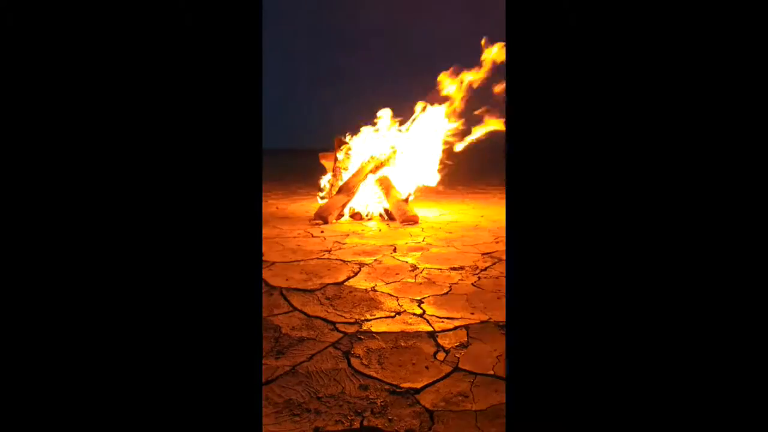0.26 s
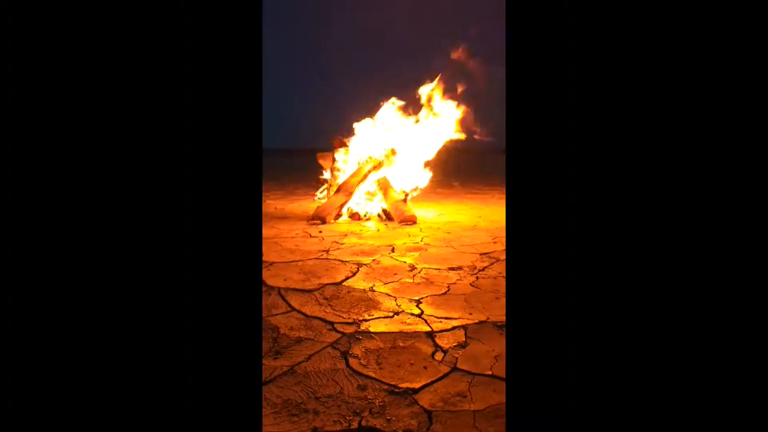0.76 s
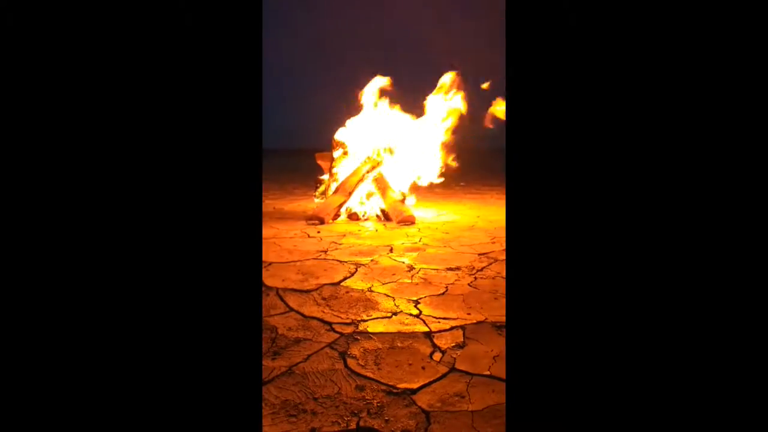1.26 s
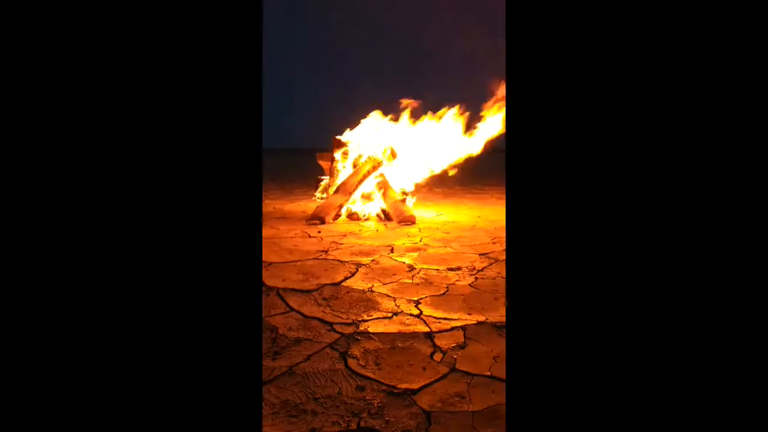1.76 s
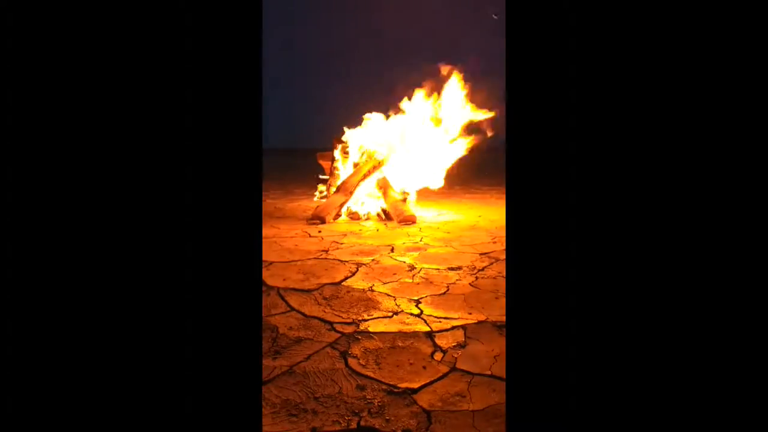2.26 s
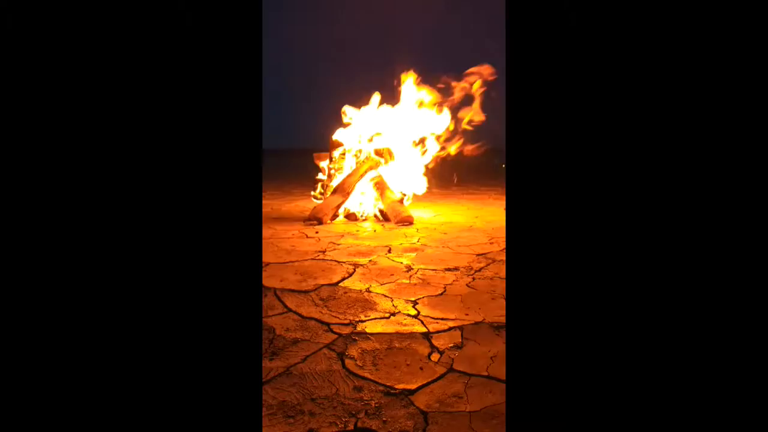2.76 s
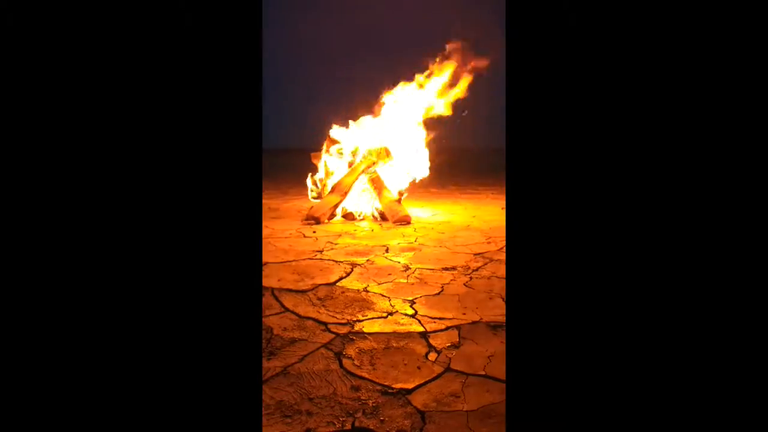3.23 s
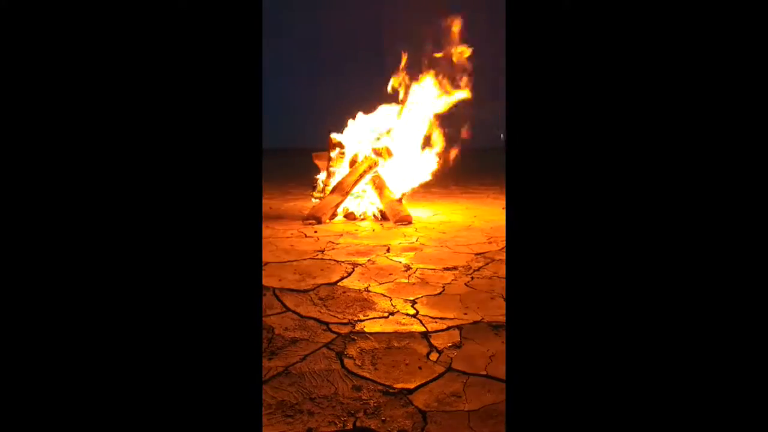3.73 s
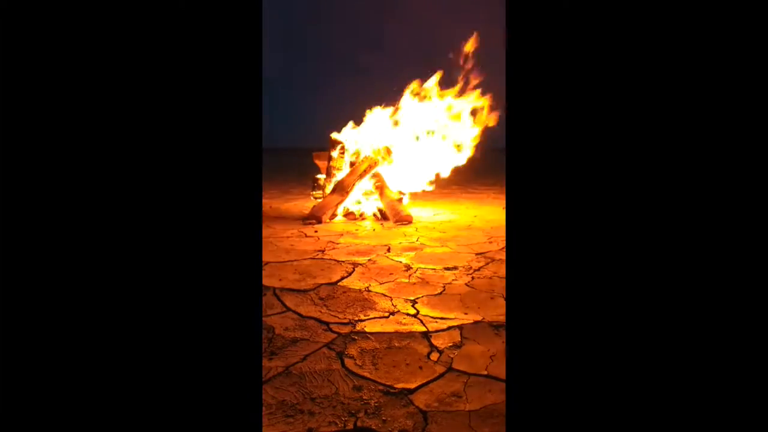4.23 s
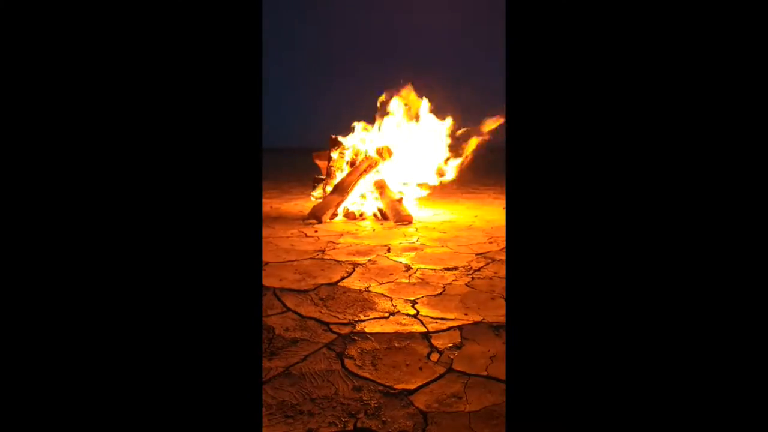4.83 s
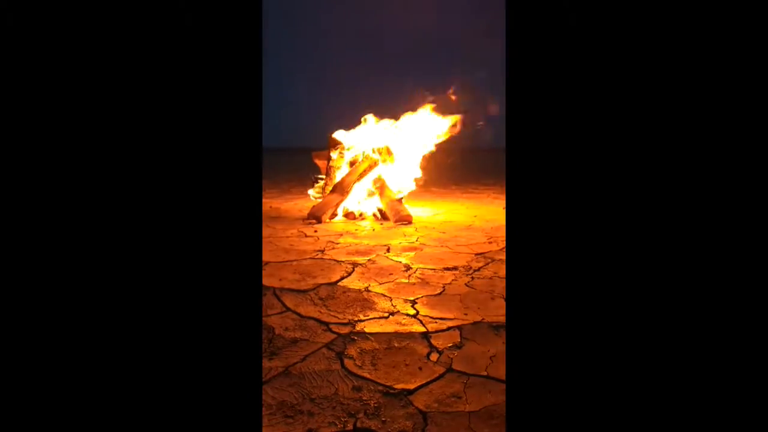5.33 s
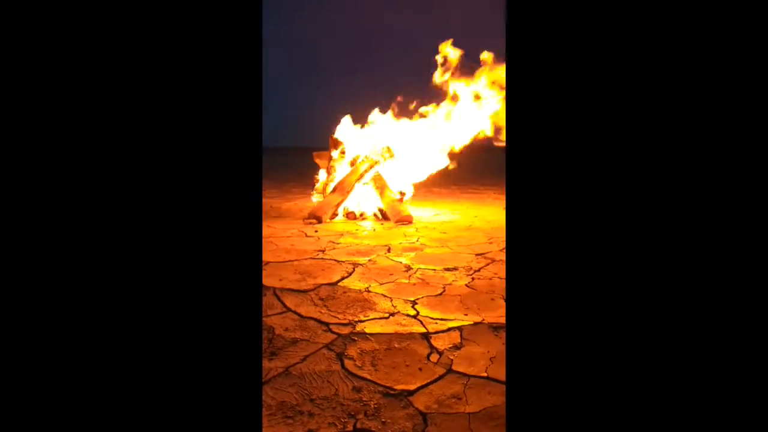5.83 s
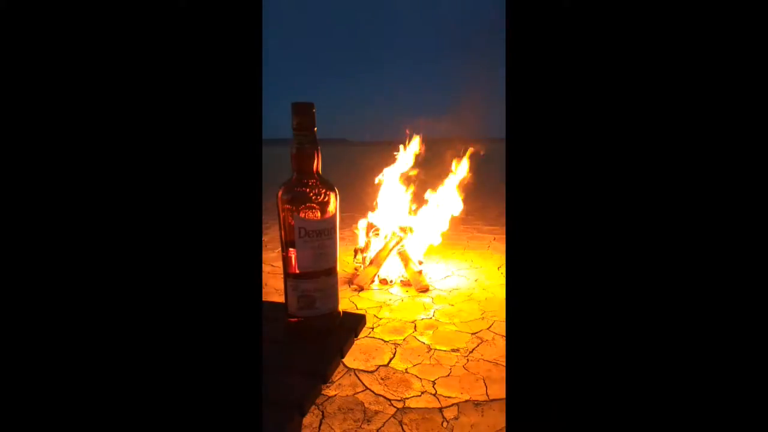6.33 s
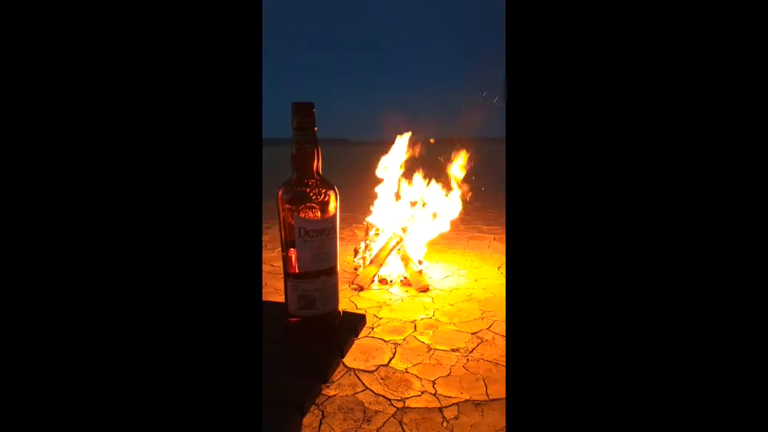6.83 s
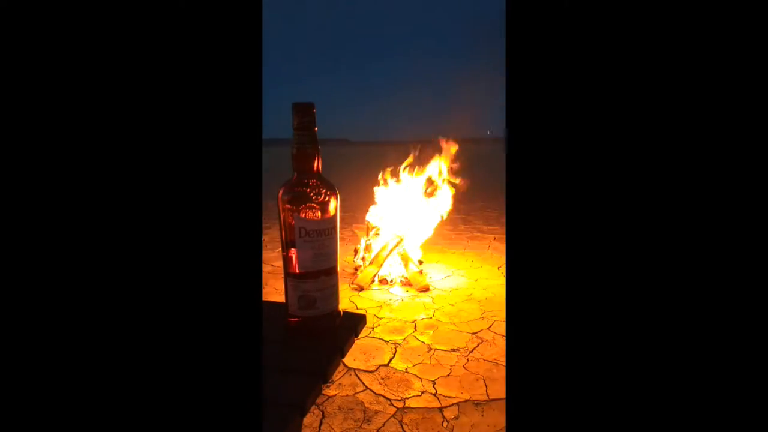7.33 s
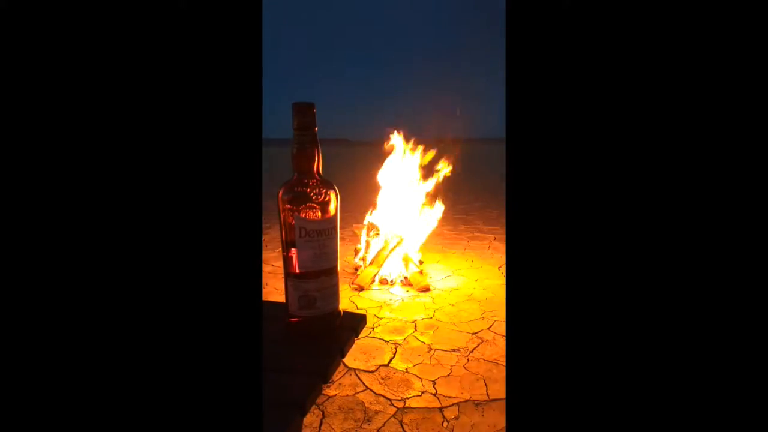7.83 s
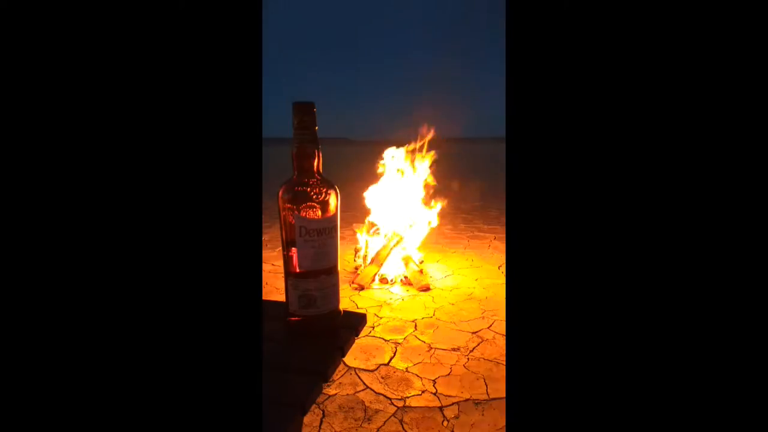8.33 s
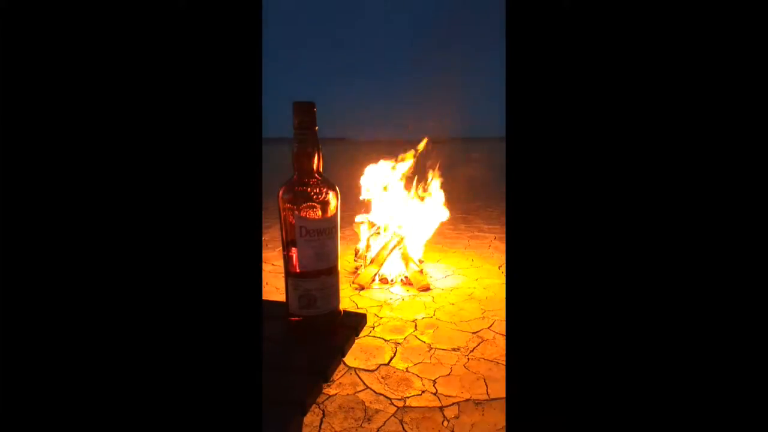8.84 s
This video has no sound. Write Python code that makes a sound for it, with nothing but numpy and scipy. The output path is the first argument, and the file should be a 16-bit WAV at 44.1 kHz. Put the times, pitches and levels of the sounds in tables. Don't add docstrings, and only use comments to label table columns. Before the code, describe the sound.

Close outdoor fire: whistly, breathy hiss from escaping gas, rapid low flame flutter, thin ember fizz and scattered ticks. Sharp wood snaps dip the phone's automatic level, which then recovers. Two abrupt scene changes, near the start and at six seconds, each fade in from near silence. Wind buffets low just before the second; afterwards the fire is a little quieter, with bright snaps, quiet burning and one late dull pop.

```python
import sys
import numpy as np
from scipy import signal
from scipy.fft import rfft, irfft, next_fast_len
from scipy.io import wavfile
from scipy.ndimage import uniform_filter1d

SR = 44100
rng = np.random.default_rng(int(sys.argv[2]) if len(sys.argv) > 2 else 0)


def amplitude_ratio(level_db):
    exponent = np.asarray(level_db, float) / 20
    return 10 ** exponent


def bounce(signal):
    frames = np.transpose(np.atleast_2d(signal))
    limited = np.clip(frames, -1, 1)
    pcm = np.round(limited * 32767).astype(np.int16)
    wavfile.write(sys.argv[1], SR, pcm)


N = 400869


def colour(x, points):
    hz, db = np.transpose(points)
    size = next_fast_len(len(x))
    f = np.maximum(np.fft.rfftfreq(size, 1 / SR), 1)
    gain = amplitude_ratio(np.interp(np.log(f), np.log(hz), db, -120, -120))
    y = irfft(rfft(x, size) * gain, size)[:len(x)]
    return y / np.std(y)


def noise():
    return rng.standard_normal(N)


def walk(rate):
    hold = int(SR / rate)
    steps = np.repeat(rng.standard_normal(N // hold + 1), hold)
    return 1.64 * uniform_filter1d(uniform_filter1d(steps, hold), hold)[:N]


def butter(x, hz, kind, order=2):
    return signal.sosfilt(signal.butter(order, np.clip(hz, 20, .45 * SR), kind, fs=SR, output="sos"), x)


def ring(x, hz, width_hz):
    y = signal.lfilter(*signal.iirpeak(min(hz, .45 * SR), hz / width_hz, fs=SR), x)
    return y / np.max(np.abs(y))


def late(x, count):
    return np.concatenate([np.zeros(count), x[:len(x) - count]])


def add(track, s, sound):
    i = int(s * SR)
    track[i:i + len(sound)] += sound[:len(track) - i]


# frequency in Hz, density in dB per Hz.
HISS_SPECTRUM = [(500, -20.5), (800, -25), (1100, -12), (1250, -16.5), (1350, -23.5), (1500, -6.5),
                 (1900, -0.5), (2300, -5.5), (2800, -7), (3300, -20.5), (3900, -30), (5000, -33),
                 (7000, -44), (16000, -58.5)]


def hiss():
    return colour(noise(), HISS_SPECTRUM) * amplitude_ratio(0.68 * walk(14))


# frequency in Hz, density in dB per Hz.
SCATTER_SPECTRUM = [(600, -3), (1350, -10), (2000, 0), (2800, -1), (3400, -28.5), (3950, -15),
                    (4500, -10.5), (6000, -43)]


def scattered_hiss():
    return amplitude_ratio(-14) * colour(noise(), SCATTER_SPECTRUM)


# frequency in Hz, density in dB per Hz.
ROAR_SPECTRUM = [(30, -14.5), (70, 1.5), (130, 1), (220, -6), (330, -17), (480, -18), (700, -26.5),
                 (1200, -19.5)]
# time in seconds, roar over hiss in dB.
FLAP_LEVELS = [(0, -4.5), (.6, -6.5), (.95, -5.5), (2, -5), (3, -5), (3.8, -6.5), (4.4, -4.5), (5, -3),
               (5.5, -5.5), (5.9, -2), (6.05, 1), (6.15, -8.5), (7.5, -7.5), (9.09, -9.5)]


def roar(t):
    flutter = colour(noise(), ROAR_SPECTRUM) * amplitude_ratio(2.0 * walk(30))
    puff_spectrum = [(150, -17.0), (300, 0.5), (500, 0.0), (800, -20.5)]
    puffs = colour(noise(), puff_spectrum) * amplitude_ratio(5.2 * walk(35) - 25.5)
    return (flutter + puffs) * amplitude_ratio(np.interp(t, *np.transpose(FLAP_LEVELS)) + 0.5)


# start in seconds, peak in dB, snap centre in Hz, body over snap in dB, body pitch in Hz.
WOOD_CRACKS = [
    (1.0545, -20, 5000, 0.5, 2940),
    (1.3846, -15.5, 9300, -1, 3300),
    (1.6271, -33.5, 5200, 1, 2800),
    (2.3345, -22.5, 4800, 8.5, 2930),
    (5.5047, -34.5, 8700, 9, 1100),
    (5.8236, -27.5, 9000, -4.5, 3500),
    (6.2844, -22.5, 5900, -2, 3500),
    (6.9133, -20.5, 11000, -7.5, 5300),
    (6.9793, -19, 9400, -8, 5000),
]
# start in seconds, peak in dB, centre in Hz.
EMBER_TICKS = [(0.0964, -48.5, 5600), (0.247, -55.5, 9000), (0.3915, -50, 7930), (0.6454, -51, 7800),
               (0.7936, -46, 13300), (0.827, -52, 7670), (0.9885, -42, 14300), (1.0095, -44, 9000),
               (1.3234, -55, 7060), (1.554, -47.5, 14200), (2.3119, -51, 11000), (2.319, -41.5, 11000),
               (2.7437, -43.5, 10900), (2.969, -41.5, 13700), (3.0632, -44, 7880), (3.5359, -48, 12200),
               (3.8926, -50, 12400), (3.9968, -43.5, 12200), (4.1756, -44, 7700), (4.595, -48, 11600),
               (4.6043, -42.5, 10000), (4.8454, -51, 14100), (5.0935, -38, 12200), (5.2021, -53, 14200),
               (5.64, -38, 12500), (6.248, -62, 12500), (6.5281, -53, 9650), (7.2143, -43, 12600),
               (7.527, -50, 14500), (8.9221, -51, 12700)]
# start in seconds, peak in dB.
FAINT_TICKS = [(0.374, -62), (0.71, -53), (1.225, -60), (1.3129, -62), (1.439, -62), (1.7873, -55),
               (2.1046, -56), (3.665, -55), (3.8124, -62), (4.2418, -56), (4.2677, -53), (4.3854, -57),
               (4.4328, -49), (4.4543, -55), (4.6254, -56), (4.7162, -59), (4.9282, -49), (5.4484, -53),
               (5.6785, -50), (6.3459, -57), (7.165, -60), (7.268, -59), (8.2033, -47), (8.8518, -53),
               (8.9539, -53)]


def cracks():
    near_track, far_track, t = np.zeros(N), np.zeros(N), np.arange(1500) / SR
    envelope = np.exp(-(t / 0.0007) ** 2) + 0.23 * np.exp(-t / 0.0057 - (t / 0.0076) ** 4)
    ticks = EMBER_TICKS + [(s, db, 11500) for s, db in FAINT_TICKS]
    small = [(s + 0.0007, db + 3.0, hz, -14, 3000) for s, db, hz in ticks]
    for s, db, hz, body_db, body_hz in WOOD_CRACKS + small:
        chance = rng.standard_normal((3, 1500))
        burst = 0.59 * chance[:2] * envelope
        burst[:, :8] += 1.14 * np.sin(2 * np.pi * (np.arange(8) + .5) / 8)
        if s < 6.1:
            echo = late(chance[2] * np.exp(-(t / 0.00051) ** 2), count=int(0.0027 * SR))
            burst = burst + amplitude_ratio(-10) * echo
        body = ring(burst, body_hz, 990) + amplitude_ratio(-6) * ring(burst, 1560, 990)
        body = body + amplitude_ratio(-14) * ring(butter(burst, 2200, "low"), 1100, 1500)
        snap = ring(butter(burst, 0.48 * hz, "high"), hz, 1.37 * hz) + amplitude_ratio(-17) * ring(burst, 4800, 1500)
        snap = signal.lfilter(*signal.iirnotch(7900, 4.5, fs=SR), snap)
        far, near = amplitude_ratio(db + 7.0) * (snap + amplitude_ratio(body_db) * body)
        add(far_track, s, far)
        add(near_track, s, amplitude_ratio(-4.5) * butter(near, 6000, "low"))
    return near_track, far_track


# start in seconds, peak in dB, pitch in Hz, width in Hz, recoil from 0 to 1.
GAS_POPS = [(0.0978, -24.5, 570, 506, 1), (0.102, -35.5, 300, 250, 0.5), (1.334, -11.5, 1190, 920, 0.23),
            (1.627, -36.5, 1060, 900, 0.3), (1.82, -48, 110, 90, .1), (2.3342, -23, 695, 800, 0),
            (3.5744, -10, 950, 900, 0.2), (5.0625, -18, 754, 800, 0.42), (5.357, -28, 300, 220, 0.45),
            (5.5043, -30, 540, 500, .2), (5.533, -38, 494, 500, .2), (5.734, -33.5, 298, 350, 0.6),
            (5.807, -39, 450, 400, 0.4), (5.824, -29, 1700, 1200, .1), (6.045, -38, 442, 400, .2),
            (6.2843, -33, 750, 900, 0.14), (6.9135, -44, 700, 900, .2), (6.9797, -57, 900, 900, 0.1),
            (8.7223, -11.5, 930, 910, 0.26)]
# start in
# seconds, peak in dB, pitch in Hz.
LOW_POPS = [
    (4.26, -32, 135),
    (4.419, -30, 129),
    (4.895, -31, 178),
    (5.639, -38, 178),
    (8.896, -39, 129),
]


def pops():
    out, t = np.zeros(N), np.arange(3000) / SR
    thuds = [(s + 0.0055, db + 0.5, hz, hz, .2) for s, db, hz in LOW_POPS]
    for s, db, hz, width_hz, recoil in GAS_POPS + thuds:
        cavity = -np.cos(2 * np.pi * hz * t) * np.exp(-np.pi * width_hz * t)
        soft = butter(butter(cavity, 2.83 * hz, "low"), 2.18 * hz, "low")
        swing = recoil * np.sin(2 * np.pi * hz / 5 * t) * np.exp(-t * hz / 1.66)
        blow = butter(soft + swing, 77, "high")
        add(out, s, amplitude_ratio(db + 4.5) * blow / np.max(np.abs(blow)))
    return out


# frequency in Hz, density in dB per Hz.
FIZZ_SPECTRUM = [(3000, -10.5), (5000, -20.5), (6500, -6), (7800, -3), (9000, -11), (10800, -6.5),
                 (12000, -4.5), (14500, -1.5), (16000, -2)]


def fizz():
    chance = rng.random(N) < 90 / SR
    ticks = chance * amplitude_ratio(4.8 * np.minimum(rng.exponential(size=N), 3)) * rng.choice([-1, 1], N)
    smear = rng.standard_normal(64) * np.exp(-np.arange(64) / 14)
    bed = noise() * amplitude_ratio(1.5 * walk(15))
    return colour(bed + amplitude_ratio(8.0) * np.convolve(ticks, smear)[:N], FIZZ_SPECTRUM) * amplitude_ratio(-30.5)


# frequency in Hz, density in dB per Hz.
WIND_SPECTRUM = [(30, -26), (48, -4.5), (75, 4.5), (120, -1.5), (200, -13.5), (350, -20.5), (700, -36)]
# centre in seconds, half length in seconds, rise in dB.
WIND_GUSTS = [(.55, .15, -3), (3.2, 0.046, 8), (4.24, 0.036, 10), (4.425, .04, 17), (5.624, .02, 17),
              (5.69, 0.015, 10), (5.767, 0.061, 14.5), (5.868, 0.058, 18), (6.005, 0.085, 17.5),
              (7.8, 0.58, -0.5), (7.997, .1, 3), (8.9, 0.039, 1)]


def wind(t):
    gust_db = sum(db * np.exp(-((t - at) / half) ** 2) for at, half, db in WIND_GUSTS)
    return colour(noise(), WIND_SPECTRUM) * amplitude_ratio(-14 + gust_db + 1.7 * walk(25))


# start in seconds, level in dB.
INSECT_CHIRPS = [
    (3.81, 0),
    (4.58, -2),
    (5.112, -2),
    (5.147, -7),
    (8.925, 3),
]


def insect():
    out, t = np.zeros(N), np.arange(500) / SR
    pip = np.hanning(len(t)) * np.sin(2 * np.pi * 3960 * t)
    for s, db in INSECT_CHIRPS:
        for later_s in (0, 1 / 29):
            add(out, s + later_s, amplitude_ratio(db) * pip)
    return amplitude_ratio(-11.5) * out


def whine():
    return amplitude_ratio(-46) * ring(noise(), 13700, 90)


def self_noise():
    return amplitude_ratio(-37.5) * butter(noise(), 6000, "high")


# time in seconds, gain just after in dB.
GAIN_DROPS = [
    (0, -8),
    (.19, 0),
    (1.054, -10),
    (1.387, -15),
    (2.336, -10.5),
    (3.577, -2),
    (6.08, -7.5),
    (6.287, -7),
    (6.916, -4.5),
    (6.983, -3),
]


def recorder_gain_db(t):
    hold_s, recover_db_per_s = 0.065, 10
    s, db = np.transpose(GAIN_DROPS)
    last = np.clip(np.searchsorted(s, t) - 1, 0, None)
    return np.minimum(db[last] + recover_db_per_s * np.maximum(t - s[last] - hold_s, 0), 0)


# sound start in seconds, cut in seconds, hiss level at full gain in dB.
FIRE_SHOTS = [
    (-1, .174, -50),
    (.215, 6.063, -49.7),
    (6.115, 10, -52),
]


def shot_fades(t):
    fade_in_s, fade_from, cut_s = 0.33, 0.036, 0.0014
    level = 0
    for start, end, db in FIRE_SHOTS:
        ramp = np.minimum(fade_from + (t - start) / fade_in_s, (end - t) / cut_s)
        level = level + amplitude_ratio(db + 9) * (t > start) * np.clip(ramp, .001, 1)
    return level


def scene():
    t = np.arange(N) / SR
    fade = shot_fades(t)
    gain = fade * amplitude_ratio(recorder_gain_db(t))
    flames, (near_crack, far_crack) = roar(t), cracks()
    near = gain * (hiss() + insect() + whine() + flames + amplitude_ratio(-5.0) * fizz() + wind(t))
    near = near + near_crack + pops() + fade * self_noise()
    far_flames = amplitude_ratio(1.16) * late(flames, count=11)
    far = gain * (far_flames + fizz() + amplitude_ratio(-14.5) * wind(t) + scattered_hiss()) + far_crack
    port_lag, far_in_left, near_in_right = 20, 0.61, 0.74
    far_leak = late(butter(far, 9700, "low", order=1), count=port_lag - 1)
    left = near - far_in_left * far_leak + amplitude_ratio(-1) * gain
    right = far - near_in_right * late(near, count=port_lag)
    return np.array([left, right])


def top_cut(x):
    return signal.sosfilt(signal.butter(12, 17010, fs=SR, output="sos"), x)


def record(dry):
    cut = signal.sosfilt(signal.ellip(8, .2, 45, 15950, fs=SR, output="sos"), dry)
    return top_cut(cut)


dry = scene()
out = record(dry)
bounce(out)
```